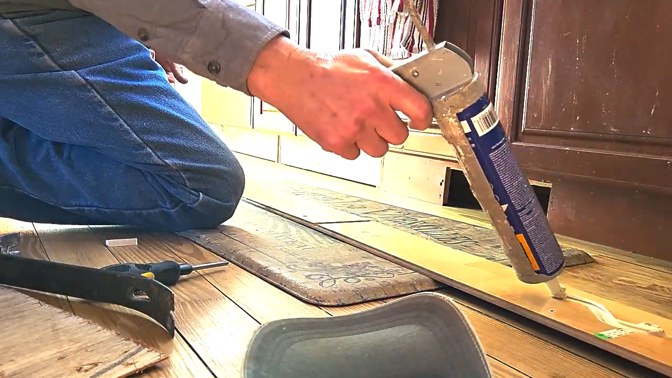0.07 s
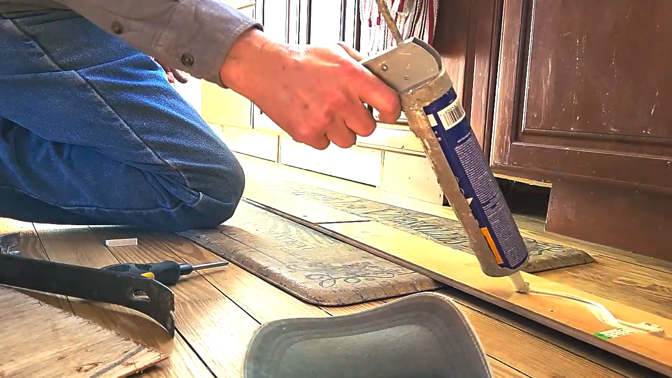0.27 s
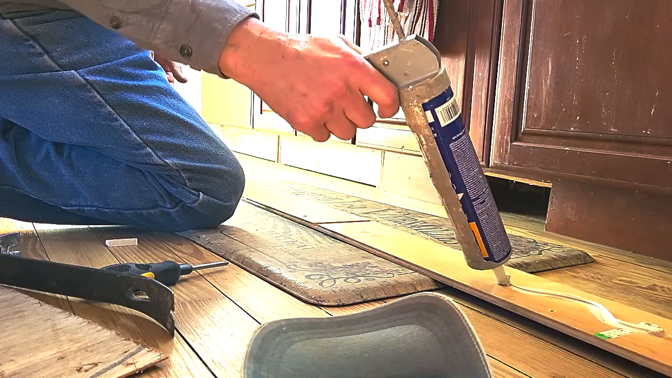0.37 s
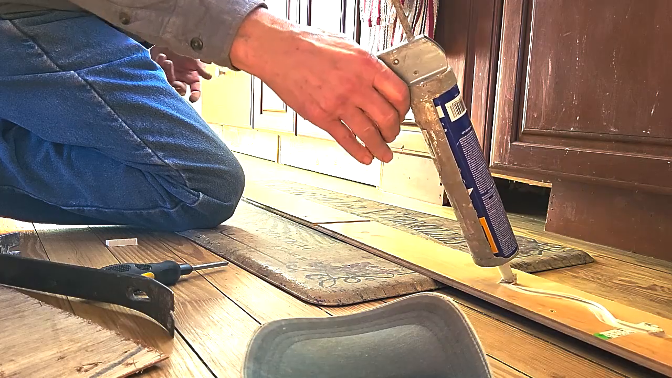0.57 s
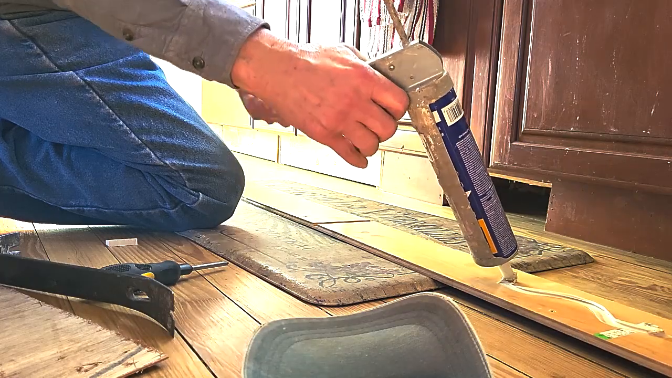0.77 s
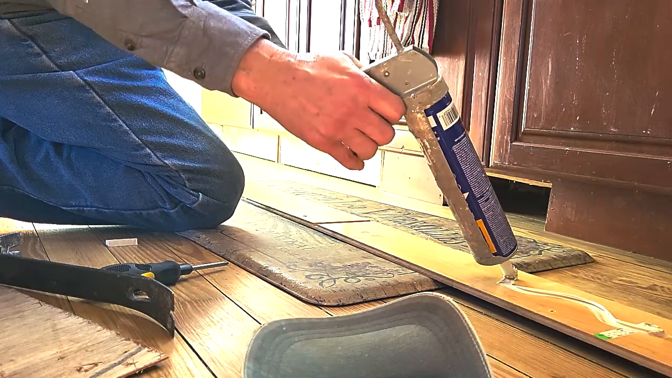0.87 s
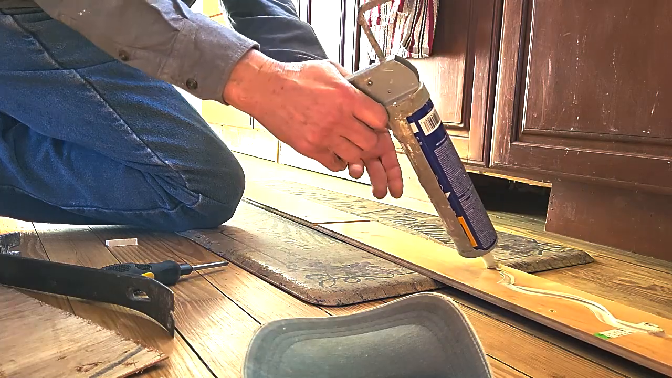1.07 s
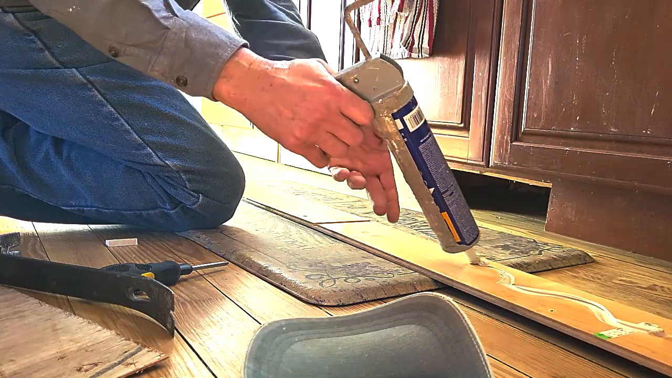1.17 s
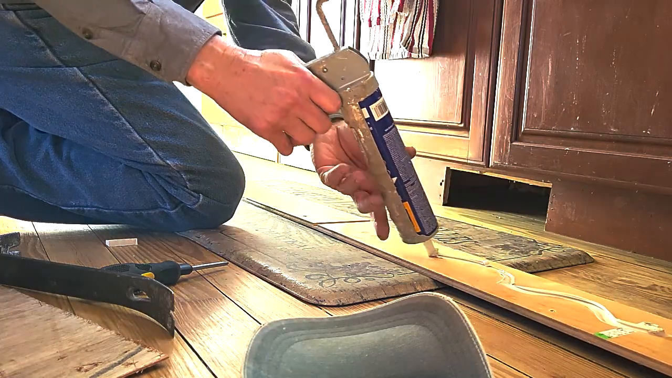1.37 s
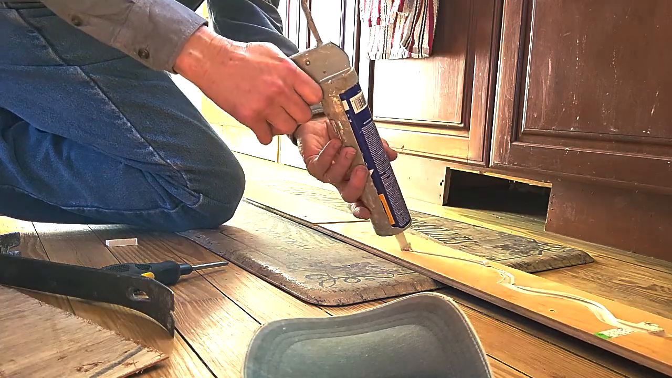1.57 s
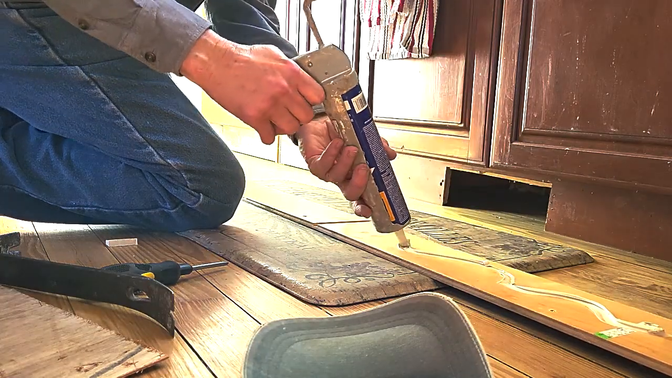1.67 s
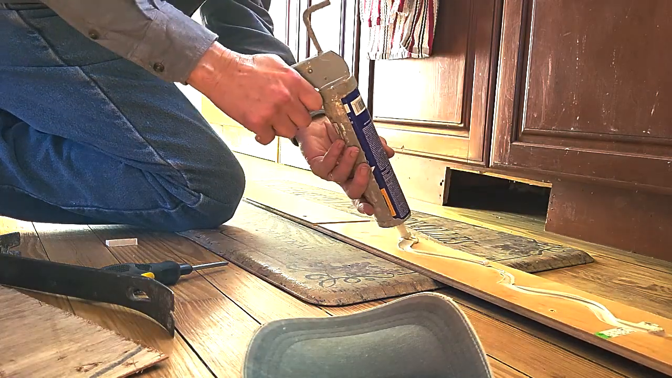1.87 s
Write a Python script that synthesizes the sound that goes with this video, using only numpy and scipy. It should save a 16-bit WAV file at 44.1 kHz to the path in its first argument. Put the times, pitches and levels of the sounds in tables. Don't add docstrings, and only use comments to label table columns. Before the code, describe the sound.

Metallic snap and loud rattling clatter from a caulking gun, then quiet rubbing and a small tick

```python
import sys
import numpy as np
from scipy import signal
from scipy.fft import rfft, irfft
from scipy.io import wavfile
from scipy.ndimage import uniform_filter1d

SR = 44100
rng = np.random.default_rng(int(sys.argv[2]) if len(sys.argv) > 2 else 0)


def wav_out(sig):
    wavfile.write(sys.argv[1], SR, np.round(np.clip(np.atleast_2d(sig).T, -1, 1) * 32767).astype(np.int16))


def ratio(d):
    e = np.asarray(d, float) / 20
    return 10 ** e


N = 83790
PAD = 8192
T = np.arange(PAD) / SR


def level(x, db):
    return x * ratio(db) / np.sqrt(np.mean(x ** 2))


def colour(x, table):
    n = x.shape[-1]
    bin_hz = np.maximum(np.arange(n // 2 + 1) * SR / n, 1)
    hz, db = np.array(table, float).T
    gain = ratio(np.interp(np.log(bin_hz), np.log(hz), db))
    return irfft(rfft(x) * gain, n)


def band(hz, width, channels=1):
    b, a = signal.iirpeak(hz, hz / width, SR)
    noise = rng.standard_normal((channels, N + PAD))
    resonant = signal.lfilter(b, a, signal.lfilter(b, a, noise))
    return level(resonant[:, PAD:], 0)


def walk(rate):
    hold = int(SR / rate)
    steps = np.repeat(rng.standard_normal(N // hold + 1), hold)
    return 0.57 * uniform_filter1d(uniform_filter1d(steps, hold), hold)[:N]


def decay(t, t60):
    return np.exp(-np.log(1000) * t / t60)


# frequency in Hz, density in dB per Hz.
FLOOR_SPECTRUM = [(20, 2), (190, -4), (330, -12), (480, -19.5), (1100, -26.5), (1400, -35), (8800, -45.5),
                  (12600, -46.5), (14500, -63)]
# frequency in Hz, gain in dB.
PORT_TONE = [(1500, -0.5), (1850, 4.5), (2350, 4), (2800, -2), (3600, 1), (5000, 5.5), (7600, 7),
             (8800, -2)]
# frequency in Hz, width in Hz, level in dB.
HUM_LINES = [(58.4, 40, -64.5), (188.2, 11, -66), (245.3, 3.5, -73.5)]
FLOOR_DB, SWELL_DB, FLICKER_DB = -57, 0.4, 1.1
MAINS_HZ, MAINS_DB = 120.2, -58.5
ALIKE_HZ, BASS_SIDE = 1113, 0.04


def house():
    out, swell = 0, walk(0.68)
    for hz in 25 * 2 ** np.arange(0, 9.6, .5):
        flicker = ratio(SWELL_DB * swell + FLICKER_DB * walk(7.5))
        mid, side = band(hz, hz / 2, channels=2) * np.sqrt(hz) * flicker
        difference = min(BASS_SIDE + hz / ALIKE_HZ, 1) * side
        out = out + mid + difference * np.array([[1], [-1]])
    floor = level(colour(colour(out, FLOOR_SPECTRUM), PORT_TONE), FLOOR_DB)
    mains = ratio(MAINS_DB + 1.6 * walk(2.0)) * np.sin(2 * np.pi * MAINS_HZ * np.arange(N) / SR)
    hum = sum(ratio(db) * band(hz, width) for hz, width, db in HUM_LINES)
    return floor + mains + hum


def add(out, s, x):
    i = PAD + int(s * SR)
    out[:, i:i + x.shape[1]] += x[:, :out.shape[1] - i]


PORT_SCATTER_DB, MODE_SPLIT = 4, .006


def ring(modes, tone_db):
    hz, db, t60 = np.repeat(np.array(modes, float), 2, axis=0).T[:, :, None]
    strength, phase, detune = rng.standard_normal((3, 2, len(hz), 1))
    gain = ratio(db + tone_db(hz) + PORT_SCATTER_DB / 2 * strength)
    split_hz = hz * (1 + MODE_SPLIT * detune[0])
    tone = np.sin(2 * np.pi * split_hz * T + 2.1 * phase)
    return np.sum(gain * decay(T, t60) * tone, axis=1)


FRAME_TOP_HZ, TREBLE_HZ, STEEL_LOW_HZ = 3000, 9000, 1000
RISE_S, RING_TO_ROOM_DB = .0006, -15


def steel(out, feed, blows, modes, crack_tone, crack_db):
    low_cut = signal.butter(2, STEEL_LOW_HZ, "high", fs=SR, output="sos")
    rise = np.minimum(T / RISE_S, 1)
    for s, db, frame_db, treble_db, contact_s in blows:
        def tone_db(hz):
            return frame_db * (hz < FRAME_TOP_HZ) + treble_db * (hz > TREBLE_HZ)

        rung = ring(modes, tone_db) * np.minimum(T / RISE_S / 2, 1)
        shape = rise * np.exp(-T / max(contact_s, .0003))
        grit = rng.standard_normal((3, PAD)) * ratio(1.1 * rng.exponential(size=PAD)) * shape
        tilt = [(FRAME_TOP_HZ * .9, frame_db), (FRAME_TOP_HZ * 1.1, 0),
                (TREBLE_HZ * .9, 0), (TREBLE_HZ * 1.1, treble_db)]
        shared_and_own = grit[0] + grit[1:]
        crack = colour(colour(shared_and_own, crack_tone), tilt) * rise * (T < .1)
        crack = signal.sosfilt(low_cut, crack)
        rung, crack = level(rung, db - 14), level(crack, db - 14 + crack_db)
        add(out, s, rung + crack)
        add(feed, s, ratio(RING_TO_ROOM_DB) * rung + crack)


# start in seconds, level in dB, frame modes in dB, treble in dB, contact length in seconds.
CLATTER = [(-.12, -40, 1, -11.5, 0.0023), (0.0907, -41.5, 1, -2, 0.004), (0.13, -59, -1, -11.5, 0.004),
           (0.189, -65.5, -6, -15.5, 0.011), (0.4065, -42, 10, -18.5, .004), (0.4094, -32.5, -3, 6, 0.0049),
           (0.4114, -31.5, 0, 6.5, 0.001), (0.4163, -41.5, 2, -10, 0.0041), (.426, -38.5, 3, -13.5, .008),
           (.431, -37.5, 16.5, -6.5, 0.0037), (0.4349, -26, -7.5, -5, 0.0015),
           (.4372, -26.5, -0.5, -12, 0.005), (.44, -34.5, -1, -12, 0.0037), (0.4418, -32.5, -5, -18, 0.004),
           (0.4502, -25.5, -4.5, -1, 0.0037), (0.4531, -33, 0, 4, 0.0017), (0.4565, -31, 11, -9.5, 0.0082),
           (0.4577, -32, 3, -12.5, 0.001), (0.469, -38, 1, -16, 0.0058), (0.472, -49, 12, -13.5, 0.0026),
           (0.496, -38.5, 7, -9.5, 0.009), (1.737, -72, -9, -9, .003), (1.8975, -66.5, -2, 0, 0.0036)]
# frequency in Hz, level in dB, 60 dB decay time in seconds.
GUN_MODES = [(2019, 2, 0.061), (2165, 0.5, 0.044), (2392, 2, 0.07), (2542, -6.5, .04), (2710, -8.5, 0.026),
             (3980, -6, 0.056), (4260, -1, 0.037), (4450, -6, 0.02), (4990, -3, 0.052), (5690, -11, 0.026),
             (6110, -8, 0.0397), (7150, 3, 0.025), (7780, -2, 0.023), (13410, -14, 0.012)]
# frequency in Hz, density in dB per Hz.
GUN_CRACK = [(240, -48.5), (400, -6), (1250, -27), (1700, -16.5), (1950, -1.5), (2450, -2.5), (3300, -12),
             (4500, -8), (7230, -10.5), (11200, -25.5), (15000, -15.5), (16500, -46.5)]


def trigger_clatter(near, feed):
    steel(near, feed, CLATTER, GUN_MODES, GUN_CRACK, crack_db=0)


# frequency in Hz, 60 dB decay time in seconds, level in dB.
ROOM = [(301.5, .25, -7), (785, 0.53, 5), (1414, 1, -4.5), (2210, 0.56, -2.5), (4230, 0.53, -7.5),
        (8550, 0.35, -6), (14000, 0.25, -5.5)]
ROOM_GAP_S, ROOM_RISE_S, ROOM_TOP_HZ = 0.0013, 0.0016, 15700
EARLY_DB, EARLY_T60_S = 0.5, 0.047


def room(x):
    t, tail = np.arange(SR) / SR, 0
    room_hz, room_t60, room_db = np.array(ROOM).T
    for hz in 100 * 2 ** np.arange(0, 7.6, .5):
        t60 = np.interp(np.log(hz), np.log(room_hz), room_t60)
        db = np.interp(np.log(hz), np.log(room_hz), room_db)
        edges = [hz / 2 ** .25, min(hz * 2 ** .25, 20000)]
        half_octave = signal.butter(2, edges, "band", fs=SR, output="sos")
        noise = signal.sosfilt(half_octave, rng.standard_normal((2, SR)))
        fall = decay(t, t60) + ratio(EARLY_DB) * decay(t, EARLY_T60_S)
        tail = tail + ratio(db) * noise * fall / np.sqrt(t60 * SR / 14)
    onset = np.clip((t - ROOM_GAP_S) / ROOM_RISE_S, 0, 1)
    top_cut = signal.ellip(8, .2, 60, ROOM_TOP_HZ, fs=SR, output="sos")
    tail = signal.sosfilt(top_cut, tail * onset)
    return signal.fftconvolve(x, tail, axes=1)[:, :x.shape[1]]


# start in seconds, level in dB, upper modes in dB.
KNOCKS = [
    (0.092, -64, 3.5),
    (.408, -64.5, 12),
    (.429, -62, 14.5),
    (0.4608, -45.5, -4.5),
]
# frequency in Hz, level in dB, 60 dB decay time in seconds.
PANEL_MODES = [(304, -5, .2), (314, 0, .12), (385, -17, .05), (495, -19, .05), (740, -13, .14),
               (820, -11, .09), (1050, -20, .035)]
KNOCK_PUSH_S, PANEL_RISE_S = 0.00037, 0.0019


def panel_knocks(out):
    push = np.sin(np.pi * np.minimum(T / KNOCK_PUSH_S, 1))
    hz, mode_db, t60 = np.array(PANEL_MODES, float).T[:, :, None]
    for s, db, upper_db in KNOCKS:
        gain = ratio(mode_db + upper_db * (hz > 350))
        board = np.sum(gain * np.sin(2 * np.pi * hz * T) * decay(T, t60), axis=0)
        thud = signal.fftconvolve(push, board)[:PAD] * (1 - np.exp(-T / PANEL_RISE_S))
        add(out, s, level(thud, db - 4.5) * ratio([[7.5], [0]]))


# start in seconds, level in dB, frame modes in dB, treble in dB,
# contact length in seconds.
SNAP = [
    (.2360, -28, -6.5, 0.16, 0.0011),
    (0.2369, -31.5, 0, 0, 0.0024),
    (0.2381, -33, 2.5, -1.4, 0.003),
    (0.25, -46.5, -4, 2, .002),
    (0.2639, -50.5, -4, -0.21, .002),
]
# frequency in Hz, level in dB, 60 dB decay time in seconds.
SNAP_MODES = [(2230, -11.5, .02), (3900, -10.5, .015), (4130, -2.5, .02), (5540, -16, .015),
              (6820, -0.5, 0.03), (7230, -3.5, 0.035), (7900, 1, 0.024), (8620, -8, 0.02),
              (9060, -11.5, 0.0072), (9710, -3.5, 0.02), (12200, -11.5, 0.0092), (12680, -9.5, 0.017),
              (15200, -5.5, 0.021), (15300, -15, 0.012)]
# frequency in Hz, density in dB per Hz.
SNAP_CRACK = [(400, -25.5), (1300, -24), (1900, -8.5), (2900, -7.5), (4300, -2.5), (5400, -7), (7400, -0.5),
              (11000, -10.5), (15600, -6.5), (16600, -31)]


def pawl_snap(near, feed):
    steel(near, feed, SNAP, SNAP_MODES, SNAP_CRACK, crack_db=2)


# start in seconds, length in seconds, frequency in Hz, width in Hz, level in dB.
RUBS = [
    (0.75, 0.36, 1800, 324, -71.5),
    (0.794, 0.16, 2286, 175, -68.5),
    (1.09, 0.27, 2260, 90, -77),
    (0.907, 0.29, 4760, 2900, -78.5),
    (1.37, 0.073, 9100, 5000, -85.5),
    (1.53, 0.12, 3500, 185, -82.5),
    (1.605, 0.14, 4060, 990, -74),
    (1.53, 0.18, 4760, 400, -81),
    (1.55, 0.17, 2010, 780, -73),
]


def rubbing():
    t, out = np.arange(N) / SR, 0
    for s, long_s, hz, width, db in RUBS:
        swell = np.sin(np.pi * np.clip((t - s) / long_s, 0, 1)) ** 0.49
        out = out + ratio(db + 2 * walk(42.42)) * swell * band(hz, width, channels=2)
    return out


# start in seconds, level in dB, frame modes in dB, treble in dB,
# contact length in seconds.
TICK = [
    (1.8374, -58, 0.5, -6, .0015),
    (1.838, -51, 0.0021, -4, 0.0028),
]
# frequency in Hz, level in dB, 60 dB decay time in seconds.
TICK_MODES = [(1940, -13, .05), (2100, -16, .04), (4110, -9, .04), (4890, 0, .06), (5010, -3, .11),
              (5140, -2, .07), (5900, -12, .02), (6490, -12, .025), (7860, -9, .04)]
# frequency in Hz, density in dB per Hz.
TICK_CRACK = [(500, -33.5), (1400, -10), (2000, -8), (3000, -6), (4900, 7.5), (7800, -10), (9000, -16),
              (16000, -35.5)]


def pawl_tick(near, feed):
    steel(near, feed, TICK, TICK_MODES, TICK_CRACK, crack_db=-4)


LEFT_LAG_S, PAN_DB = .0001, -4


def scene():
    near, feed = np.zeros((2, 2, N + PAD))
    trigger_clatter(near, feed)
    pawl_snap(near, feed)
    pawl_tick(near, feed)
    near[0] = np.roll(near[0], int(LEFT_LAG_S * SR))
    panel_knocks(near)
    panel_knocks(feed)
    gun_in_room = (near + room(feed)) * ratio([[PAN_DB / 2], [-PAN_DB / 2]])
    return gun_in_room[:, PAD:] + house() + rubbing()


def band_limit(x):
    return signal.sosfilt(signal.butter(12, 17150, fs=SR, output="sos"), x)


TOP_HZ = 16800


def record(dry):
    top_cut = signal.ellip(8, .2, 70, TOP_HZ, fs=SR, output="sos")
    mix = signal.sosfilt(top_cut, dry)
    return band_limit(mix)


dry = scene()
out = record(dry)
wav_out(out)
```